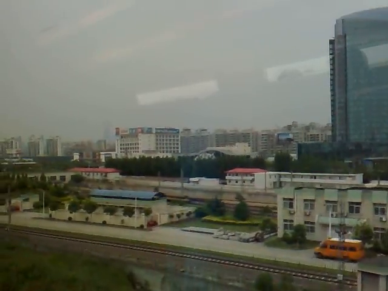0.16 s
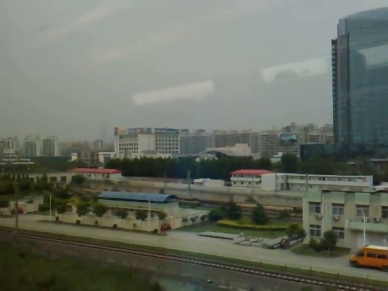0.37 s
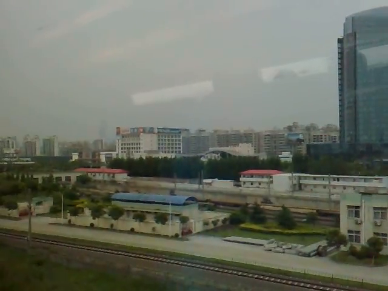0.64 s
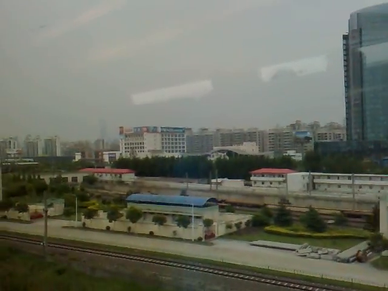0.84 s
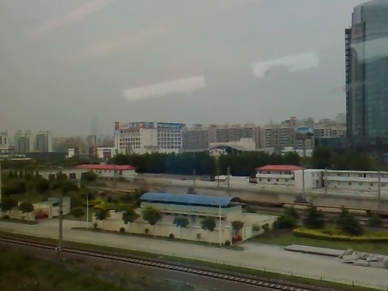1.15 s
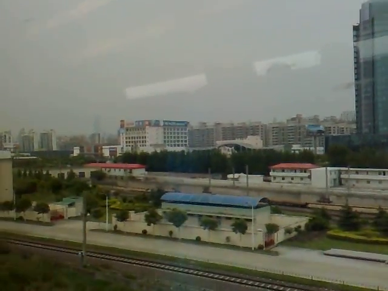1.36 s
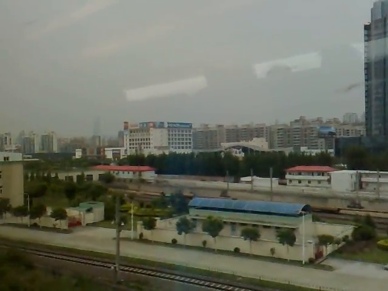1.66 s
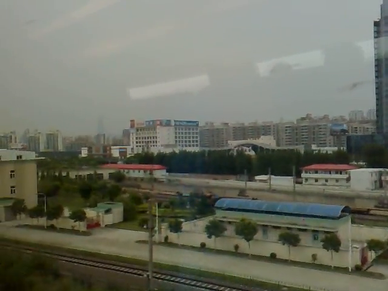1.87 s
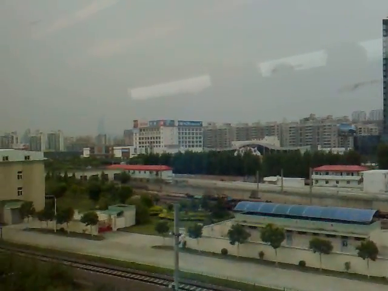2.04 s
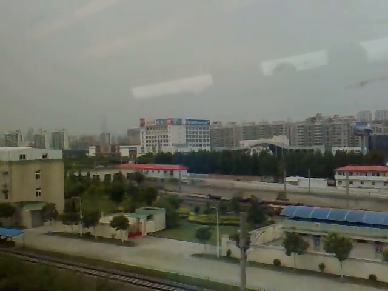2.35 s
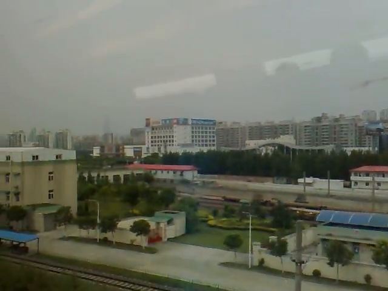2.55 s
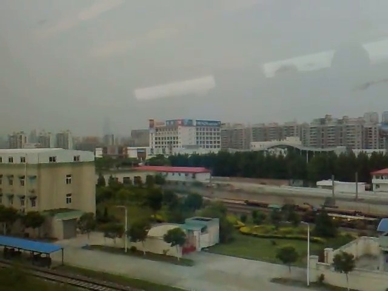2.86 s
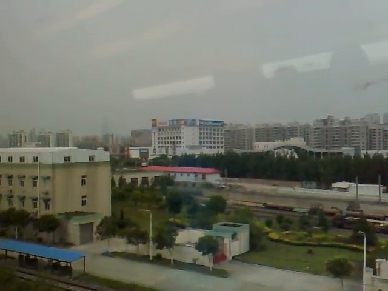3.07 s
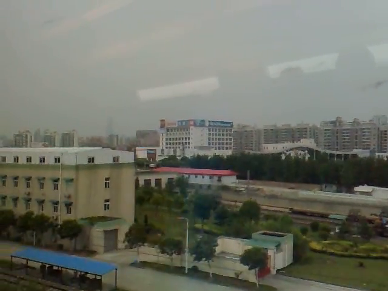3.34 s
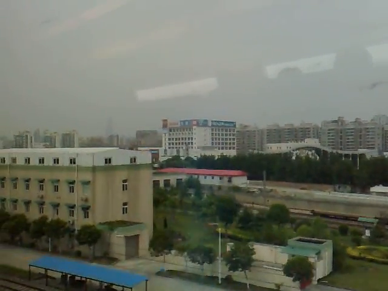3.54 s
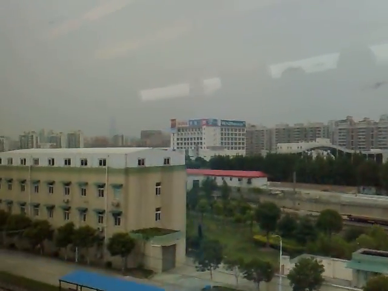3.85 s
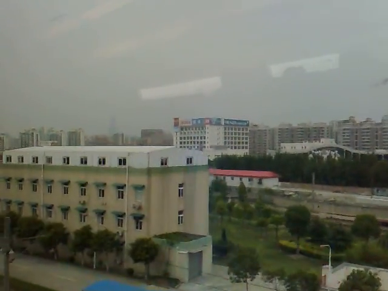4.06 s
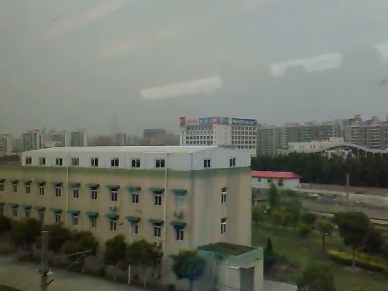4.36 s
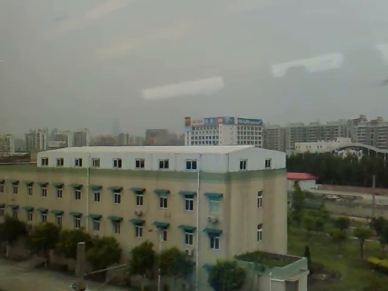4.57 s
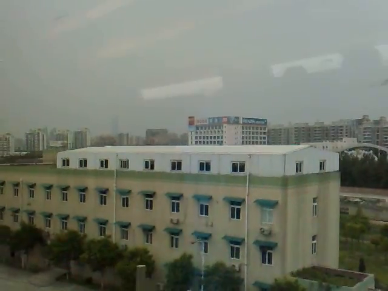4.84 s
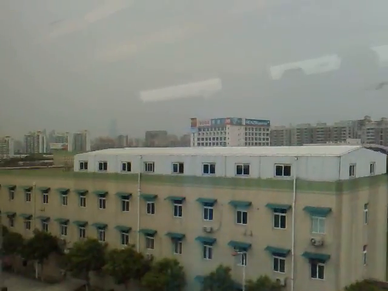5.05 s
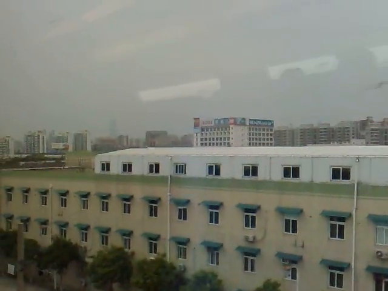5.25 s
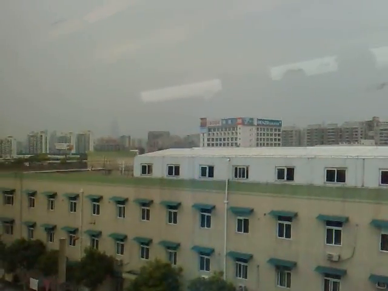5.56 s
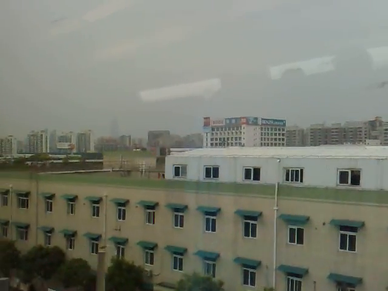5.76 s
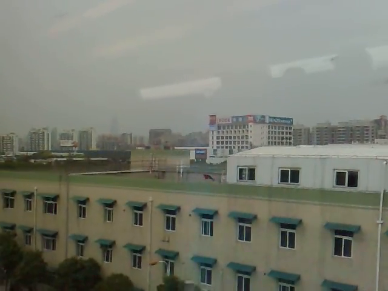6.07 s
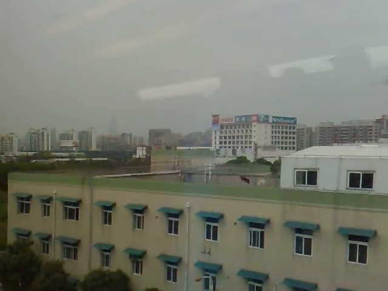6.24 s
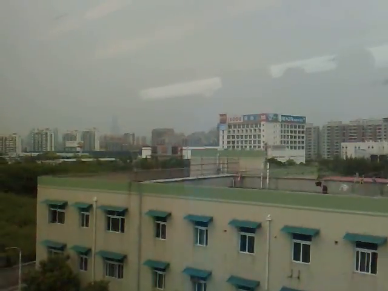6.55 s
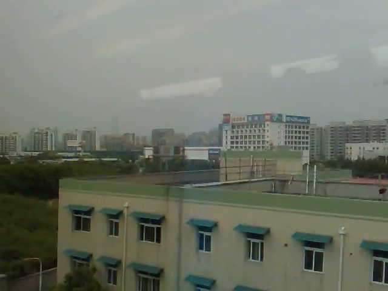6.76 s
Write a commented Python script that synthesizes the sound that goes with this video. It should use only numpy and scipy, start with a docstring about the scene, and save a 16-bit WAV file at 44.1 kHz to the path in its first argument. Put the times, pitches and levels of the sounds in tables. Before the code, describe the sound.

Inside a slowing magnetic levitation train, a low rumble and rushing air run under a gradually falling whine, with a few small plastic clicks.

```python
"""A window seat in a slowing magnetic levitation train, one microphone inside the cabin.
From the start, magnets passing the guideway's slots and joints make a falling whine and a low throb;
the car rumbles, air rushes along the hull, vents hiss, and a rough drone swells an octave over the whine.
Close by, plastic parts brush and click, with one hard rub at 1.1 s. At 2.2 s a bump shakes a panel.
From 4.7 s the train brakes a little harder: the throb recedes and the panel booms more."""
import sys
import numpy as np
from scipy import signal
from scipy.fft import rfft, irfft, next_fast_len
from scipy.io import wavfile

SR = 44100
rng = np.random.default_rng(int(sys.argv[2]) if len(sys.argv) > 2 else 0)


def log_audio(samples):
    """Write samples as a 16-bit WAV file to the path given in sys.argv[1]."""
    # one column per channel
    frames = np.atleast_2d(samples).T
    # limit to full scale, then quantise
    limited = np.clip(frames, -1, 1)
    pcm = np.round(limited * 32767).astype(np.int16)
    wavfile.write(sys.argv[1], SR, pcm)


N = 304731
T = np.arange(N) / SR
SLOTS_PER_SPAN, BRAKE_S = 72, 4.7


def amp(db):
    """Decibels to gain."""
    return 10 ** (np.asarray(db) / 20)

def unit(x):
    """Scales to rms 1."""
    return x / np.sqrt(np.mean(abs(x) ** 2) + 1e-20)

def curves(rows):
    """Each column after the time column, at every sample."""
    times, *columns = np.transpose(rows)
    return [np.interp(T, times, column) for column in columns]

def swell(middle_s, half_s):
    """A smooth rise to 1 and fall."""
    return np.exp(-((T - middle_s) / half_s) ** 2)

def braked(before_db, after_db, settle_s=0.55):
    """A gain that moves to a new level as the harder braking sets in."""
    return amp(np.interp(T, [BRAKE_S, BRAKE_S + settle_s], [before_db, after_db]))

def add(mix, start_s, sound):
    """Mixes a sound in at its start time."""
    part = mix[max(round(start_s * SR), 0):][:len(sound)]
    part += sound[:len(part)]

def noise(gain, size=N):
    """Noise of rms 1 whose spectrum is the function gain(Hz)."""
    full = next_fast_len(size + 2048)
    spectrum = rfft(rng.standard_normal(full)) * gain(np.fft.rfftfreq(full, 1 / SR))
    return unit(irfft(spectrum, full)[:size])

def coloured(points):
    """Noise of rms 1 shaped by points (frequency [Hz], relative level [dB])."""
    hz, db = np.transpose(points)
    return noise(lambda f: amp(np.interp(np.log(f + 1), np.log(hz), db)))

def resonant(modes, size=N):
    """Noise of rms 1 in steep resonances (centre [Hz], width [Hz], relative level [dB])."""
    def gain(f):
        powers = (amp(db) ** 2 / width / (1 + 2 * (1.2 * (f - hz) / width) ** 2) ** 2
                  for hz, width, db in modes)
        return np.sqrt(sum(powers))
    return noise(gain, size)

def waver(rate_hz, step=64):
    """A slow, complex random signal of rms 1."""
    f = np.fft.fftfreq(N // step + 2, step / SR)
    white = rng.standard_normal((len(f), 2)) @ [1, 1j]
    slow = np.fft.ifft(np.fft.fft(white) / (1 + (f / rate_hz) ** 2))
    return np.interp(np.arange(N) / step, np.arange(len(f)), unit(slow))

def lines(rows, spans, rough, rate_hz):
    """Tones at multiples of the span rate; uneven gaps make each waver in level and phase."""
    out = np.zeros(N)
    for order, db in rows:
        wobble = np.sqrt(1 - rough) + np.sqrt(rough) * waver(rate_hz)
        tone = np.exp(2j * np.pi * (order * spans + rng.random()))
        out += amp(db) * (wobble * tone).real
    return np.sqrt(2) * out

def spans_passed(start_hz=314, sag_hz_per_s=6.42, brake_hz_per_s=1.35):
    """Distance travelled in guideway spans; the stator slots pass ever more slowly."""
    slot_hz = start_hz - sag_hz_per_s * T - brake_hz_per_s * np.maximum(T - BRAKE_S, 0)
    return np.cumsum(slot_hz) / SR / SLOTS_PER_SPAN

# the magnetic whine as it reaches the seat (time [s], level [dB])
WHINE_LEVELS = [(0, -39.5), (0.15, -31.5), (0.8, -26.5), (1.1, -24.5), (1.5, -24.5), (1.72, -33.5),
                (1.87, -30), (2.1, -39.5), (2.45, -28), (3.1, -26.5), (3.45, -29), (3.57, -41), (3.68, -29),
                (3.9, -30), (4.15, -42.5), (4.35, -27.5), (4.85, -23.5), (5.45, -25), (6.05, -32.5),
                (6.72, -33.5), (6.91, -32.5)]
# tones around it (order [cycles per span], level [dB re whine])
WHINE_LINES = [(60, -34.5), (66, -30.5), (68, -19.5), (78, -21)]

def whine(spans):
    """Magnets pass the stator slots; a tone just below beats against theirs, most near the end."""
    slot_tone = lines([(SLOTS_PER_SPAN, 0)], spans, rough=0.023, rate_hz=16)
    side_tones = lines(WHINE_LINES, spans, rough=0.57, rate_hz=2.7)
    beat_tone = lines([(SLOTS_PER_SPAN - 2, 0)], spans, rough=0.13, rate_hz=2.7)
    beat_gain = amp(-47) + amp(-43) * swell(middle_s=6.4, half_s=0.5)
    return amp(curves(WHINE_LEVELS)[0]) * (slot_tone + side_tones) + beat_gain * beat_tone

# low tones from the guideway below (order [cycles per span], relative level [dB])
THROB_LINES = [(6, -41), (12, -34.5), (18, -46), (24, -34.5), (30, -41)]

def throb(spans):
    """Magnets pass the stator joints; the throb recedes under harder braking."""
    return braked(before_db=4, after_db=-7.5) * lines(THROB_LINES, spans, rough=0.53, rate_hz=0.33)

# a low rumble all around the microphone (frequency [Hz], relative level [dB])
RUMBLE_SPECTRUM = [(4, -42.5), (12, -22), (24, -9), (36, -9), (52, -0.5), (70, 1.5), (100, -0.5),
                   (145, -5.5), (175, -7.5), (220, -12.5), (290, -10.5), (350, -18.5), (450, -21),
                   (700, -70.5)]
# how its two bands swell and fade (time [s], deep gain [dB], upper gain [dB])
RUMBLE_GAINS = [(0, -29, -20.5), (.15, -19, -26.5), (.4, -33.5, -25), (.75, -25, -25.5), (1.05, -22, -26.5),
                (1.4, -29, -27), (1.9, -32.5, -25), (2.2, -23.5, -24.5), (2.8, -21.5, -26.5),
                (3.35, -22, -27), (3.85, -36.5, -25.5), (4.15, -21, -24), (4.45, -28, -25),
                (4.9, -22.5, -27), (5.2, -26.5, -27.5), (5.6, -29, -28), (5.95, -24, -26),
                (6.4, -28, -25.5), (6.91, -29, -25)]

def rumble(split_hz=68):
    """A low rumble whose deep and upper bands swell and fade irregularly."""
    whole = coloured(RUMBLE_SPECTRUM)
    deep = signal.sosfiltfilt(signal.butter(4, split_hz, fs=SR, output="sos"), whole)
    deep_db, upper_db = curves(RUMBLE_GAINS)
    return amp(deep_db) * deep + amp(upper_db) * (whole - deep)

def panel_boom(hz=97, width_hz=11):
    """A cabin panel resonates at one bump, and again as the speed drops."""
    bump = amp(-25.5) * swell(middle_s=2.19, half_s=0.13)
    return (braked(before_db=-42, after_db=-28.5) + bump) * resonant([(hz, width_hz, 0)])

# air on the hull, outside the window (frequency [Hz], relative level [dB])
RUSH_SPECTRUM = [(200, -20.5), (400, -7.5), (540, 2), (610, 0), (650, -9), (690, -5.5), (740, -12.5),
                 (900, -15.5), (1000, -20.5), (1350, -24.5), (2050, -47.5), (2800, -38), (4500, -54),
                 (9000, -69)]
# ventilation inside the cabin (frequency [Hz], relative level [dB])
VENT_SPECTRUM = [(500, -9), (2500, 3), (4500, 6), (6500, 3.5), (8500, -1.5), (11500, -6), (15500, -0.5)]
# resonances of the trim around the seat (centre [Hz], width [Hz], relative level [dB])
TRIM_MODES = [(1090, 230, 1.5), (1490, 290, -3.5), (1682, 73, -5.5), (1740, 620, -3.5), (1904, 310, -2),
              (2330, 400, -7.5), (3050, 130, -19), (3800, 900, -17)]

def air(gust_db=1.85, flutter_db=1.5, lull_limit_db=5):
    """Hull turbulence gusts and rustles the trim over a vent hiss; all rise where the whine is weak."""
    whine_db = curves(WHINE_LEVELS)[0]
    lull_db = np.minimum(whine_db.mean() - whine_db, lull_limit_db)
    gusts_db = gust_db * waver(rate_hz=29).real
    rustle_db = gusts_db + flutter_db * waver(rate_hz=58).real
    rush = amp(-40.5 + 0.19 * lull_db + gusts_db) * coloured(RUSH_SPECTRUM)
    trim = amp(-59.5 + 0.2 * lull_db + rustle_db) * resonant(TRIM_MODES)
    hiss = amp(-71.5 + 0.26 * lull_db) * coloured(VENT_SPECTRUM)
    return rush + trim + hiss

# faint brushes and creaks close by (time [s], length [s], level [dB], centre [Hz], width [Hz])
BRUSHES = [(0.0, 0.044, -54, 2050, 220), (0.098, 0.51, -65, 1950, 300), (1.12, 0.026, -59, 1740, 400),
           (1.164, 0.013, -40.5, 854, 120), (1.293, 0.052, -53, 1710, 1600), (1.301, 0.017, -53, 2440, 200),
           (1.305, 0.02, -71, 5500, 4000), (1.65, 0.044, -69.5, 8400, 7000), (1.90, .04, -69, 6500, 4000),
           (2.56, 0.058, -55.5, 1480, 120), (2.733, 0.03, -70.5, 6450, 3560),
           (3.481, 0.031, -64, 3480, 2200), (4.177, 0.29, -60.5, 1700, 250),
           (4.999, 0.093, -65, 2680, 1630), (5.256, 0.087, -70, 5100, 1700),
           (5.257, 0.11, -71.5, 4180, 400), (5.568, 0.026, -63, 3480, 700), (5.573, .02, -70, 8000, 5970),
           (6.258, 0.077, -61.5, 2070, 300), (6.626, 0.061, -68, 4040, 2000)]

def brushes(grain_db=4, grain_hz=90):
    """Plastic slips under a light touch and fizzes in uneven grains."""
    out = np.zeros(N)
    for start_s, length_s, db, hz, width in BRUSHES:
        size = int(length_s * SR)
        add(out, start_s, amp(db) * resonant([(hz, width, 0)], size) * signal.windows.tukey(size, 0.7))
    return out * unit(amp(grain_db * waver(grain_hz).real))

# the drone's three main tones (order [cycles per span])
DRONE_ORDERS = (144, 142, 141)
# their swells at the seat, one list a tone (middle [s], half-length [s], level [dB])
DRONE_SWELLS = [
    [(0.45, 0.3, -48.5), (3.8, 2.67, -41.5), (6.8, 0.29, -45)],
    [(2.0, 0.87, -50), (3.35, 0.35, -42), (4.3, 0.31, -39)],
    [(5.7, 0.48, -36.5), (6.75, 0.23, -50)],
]
# weak neighbours (order [cycles per span], level [dB re first main tone])
FRINGE_LINES = [(132, -10), (134, -8), (136, -9.5), (138, -8.5), (140, -9), (143, -12), (146, -11),
                (147, -11), (162, -17)]
# at and just under three times the whine's pitch (order [cycles per span], level [dB re first main tone])
TWELFTH_LINES = [(210, -27), (216, -17.5)]

def drone(spans):
    """Guideway tones near the whine's octave take turns; faint ones swell with the first and beat."""
    gains = [sum(amp(db) * swell(middle_s, half_s) for middle_s, half_s, db in swells)
             for swells in DRONE_SWELLS]
    main = sum(gain * lines([(order, 0)], spans, rough=0.04, rate_hz=3)
               for order, gain in zip(DRONE_ORDERS, gains))
    fringe = lines(FRINGE_LINES, spans, rough=0.35, rate_hz=0.53)
    twelfth = lines(TWELFTH_LINES, spans, rough=0.35, rate_hz=2.5)
    return main + gains[0] * (fringe + twelfth)

# clicks near the microphone (time [s], peak [dB], pitch [factor], snap [share], hardness [dB/octave])
CLICKS = [(.217, -41, 0.89, 0.025, -2), (1.143, -33, 0.83, 0.08, -1), (1.1575, -39, 0.88, 0.14, 2),
          (1.3, -41, 0.7, 0.08, 3), (1.3116, -39, 1.34, 0.05, -6), (3.4793, -28, 0.995, 0.06, -1),
          (3.525, -33, 0.98, 0.055, -1), (5.005, -51, 2.1, 0.4, 0), (6.472, -31, 1.04, 0.012, -5),
          (6.636, -32, 0.99, 0.01, -6)]
# the ring of the plastic (frequency [Hz], relative level [dB], t60 [s])
PLASTIC_MODES = [(1130, -12, .012), (1430, -10, .014), (1730, -1, 0.023), (2070, -3.5, 0.013),
                 (2520, -4.5, 0.012), (3000, -13.5, 0.015), (4100, -18, 0.014), (6460, -21.5, .012)]

def clicks(rise_s=0.0017, snap_s=0.003, pivot_hz=2000):
    """A plastic part bends, snaps over with all its modes in step, and rings briefly."""
    out = np.zeros(N)
    t = np.arange(SR // 20) / SR - 0.003  # zero at the snap
    after = np.maximum(t, 0)
    attack = np.exp(-(np.minimum(t, 0) / rise_s) ** 2)
    for start_s, peak_db, pitch, snap_share, hardness in CLICKS:
        ring = np.zeros(len(t))
        for hz, db, t60 in PLASTIC_MODES:
            mode_db = db + hardness * np.log2(hz / pivot_hz) - 60 * after / t60
            ring += amp(mode_db) * np.sin(2 * np.pi * hz * pitch * t)
        snap = np.exp(-after / snap_s) * resonant([(5500, 4700, 0)], len(t))
        click = attack * (ring + 2 * snap_share * snap)
        add(out, start_s, amp(peak_db) * click / abs(click).max())
    return out

# a hollow plastic part close to the seat (frequency [Hz], relative level [dB], t60 [s])
HOLLOW_MODES = [(530, 0, .09), (595, -12, .1), (790, -14, .08), (880, -11, .1), (1030, -21, .12),
                (1270, -24, .15), (1440, -15.5, .12), (1725, -17, .13), (2060, -17, .08), (2300, -21, .1),
                (2627, -28, .1)]
# the rub's sharp edge (centre [Hz], width [Hz], relative level [dB])
RUB_EDGE = [(3150, 400, -2), (3830, 300, 3), (4200, 400, -2), (5000, 450, -8)]
# its fizz (centre [Hz], width [Hz], relative level [dB])
RUB_FIZZ = [(8200, 4000, 2), (13000, 5000, -1)]
# how the edge, then the fizz, dies away (level [dB], hold [s], t60 [s])
RUB_DECAYS = [(-44.5, 0.004, 0.085), (-61.5, 0.004, 0.1)]

def hard_rub(slip_s=1.141, touch_s=0.026, touch_db=-15, attack_s=0.0045, build_s=0.0025, hold_s=0.017):
    """A light touch leads into one hard slip, which rings the hollow part."""
    out = np.zeros(N)
    t = np.arange(SR // 5) / SR
    build = 1 - np.exp(-(t / build_s) ** 2)
    for hz, db, t60 in HOLLOW_MODES:
        decay = amp(-60 * np.maximum(t - hold_s, 0) / t60)
        ring = np.sin(2 * np.pi * (hz * t + rng.random()))
        scrape = 0.45 * resonant([(hz, hz / 6, 0)], len(t))
        add(out, slip_s, amp(db - 27.5) * build * decay * (ring + scrape))
    for bands, (db, noise_hold_s, t60) in zip((RUB_EDGE, RUB_FIZZ), RUB_DECAYS):
        corners_s = np.cumsum([0, touch_s, attack_s, noise_hold_s, t60])
        shape_db = np.interp(t, corners_s, [2 * touch_db, touch_db, 0, 0, -60])
        add(out, slip_s - touch_s, amp(db + shape_db) * resonant(bands, len(t)))
    return out

def cabin(direct, t60=0.14, wet_db=-11, gap_s=0.003):
    """Seats and carpet leave only a short tail."""
    t = np.arange(SR // 4) / SR
    tail = rng.standard_normal(len(t)) * amp(-60 * t / t60) * (t > gap_s)
    return direct + amp(wet_db) * signal.fftconvolve(direct, tail / np.linalg.norm(tail))[:N]

def scene():
    """Mono at the seat: the train, its tones sinking with the speed, and small plastic sounds up close."""
    spans = spans_passed()
    train = whine(spans) + throb(spans) + rumble() + panel_boom() + air() + drone(spans)
    close_by = brushes() + clicks() + hard_rub()
    return (train + cabin(close_by))[None]

def record(dry, cutoff_hz=15750, fade_s=0.003):
    """The microphone's band limit, with a short fade at each end."""
    fades = np.clip(np.minimum(T, T[-1] - T) / fade_s, 0, 1)
    lowpass = signal.firwin(511, cutoff_hz, window=("kaiser", 9), fs=SR)
    return signal.oaconvolve(dry * fades, lowpass[None], "same")


dry = scene()
out = record(dry)
log_audio(out)
```